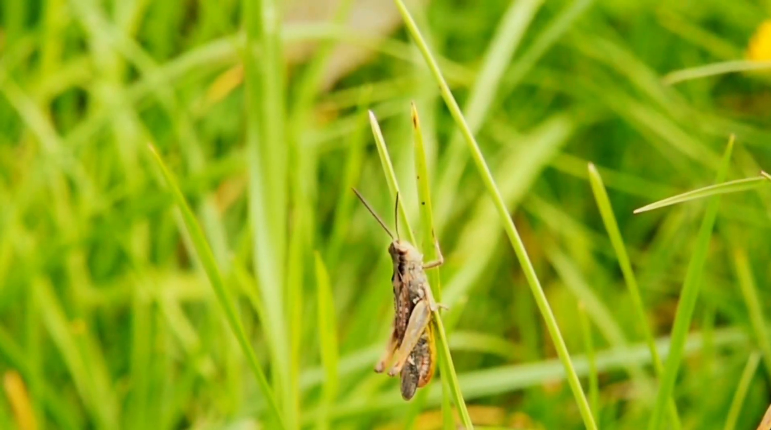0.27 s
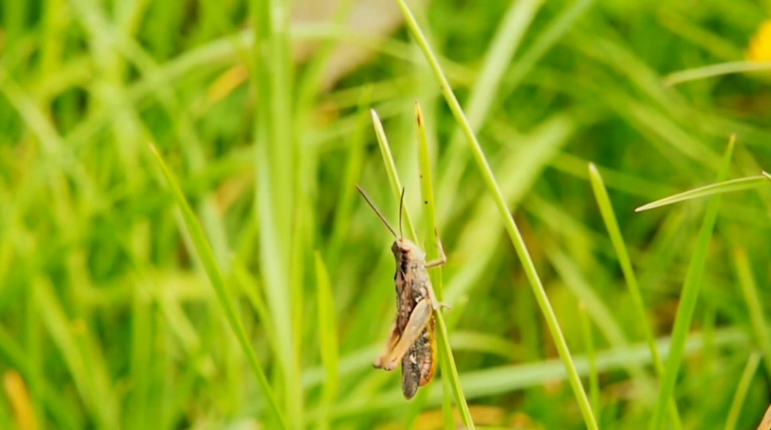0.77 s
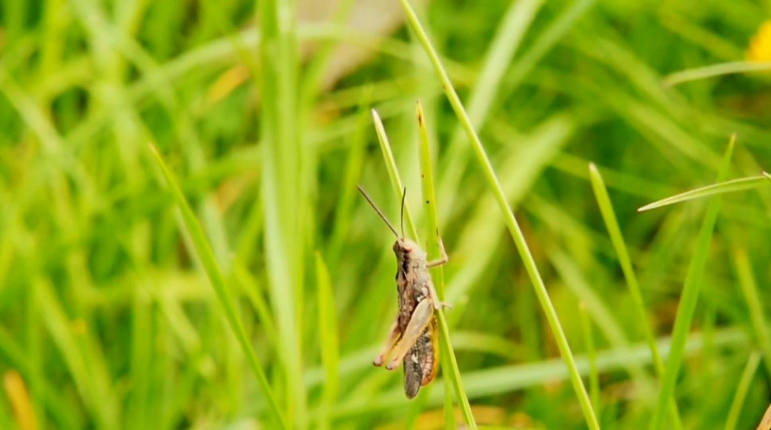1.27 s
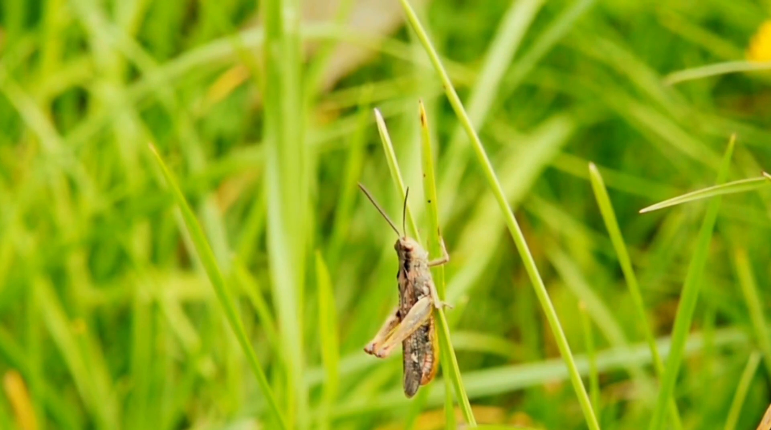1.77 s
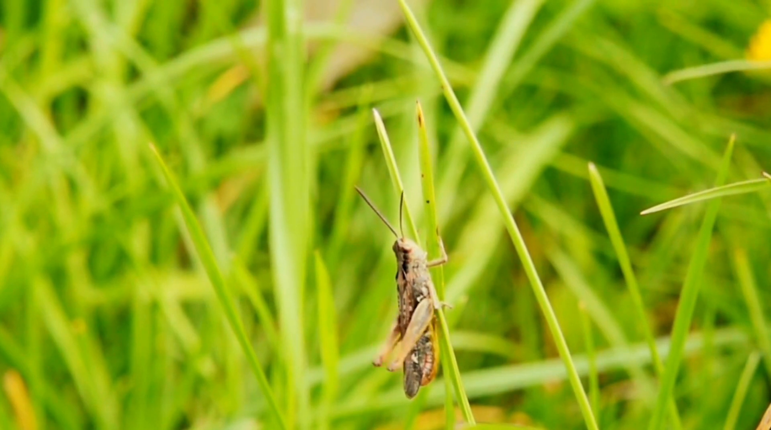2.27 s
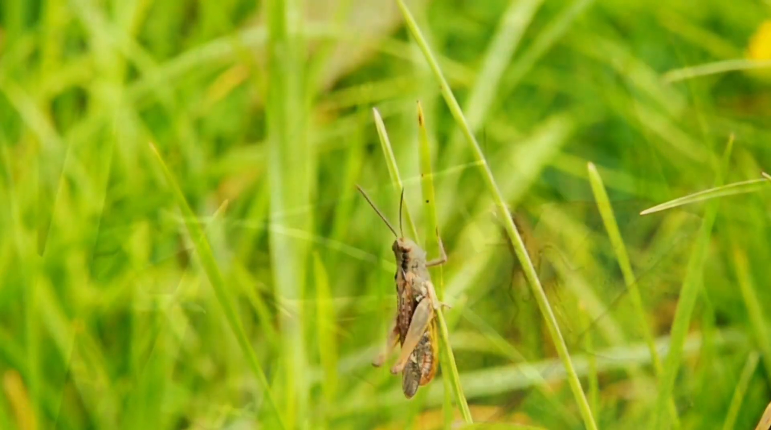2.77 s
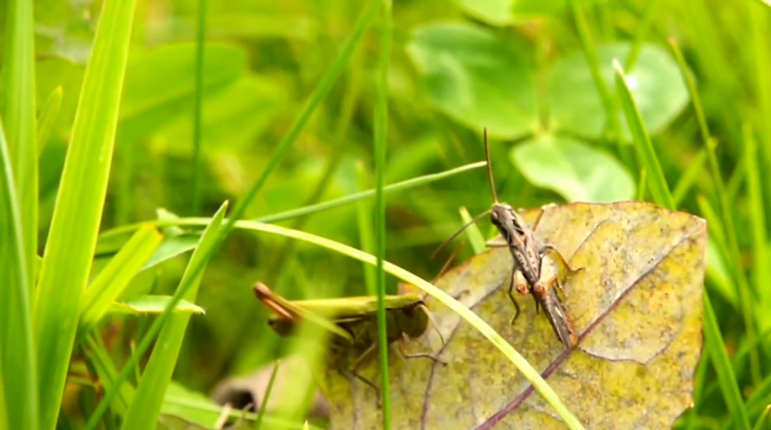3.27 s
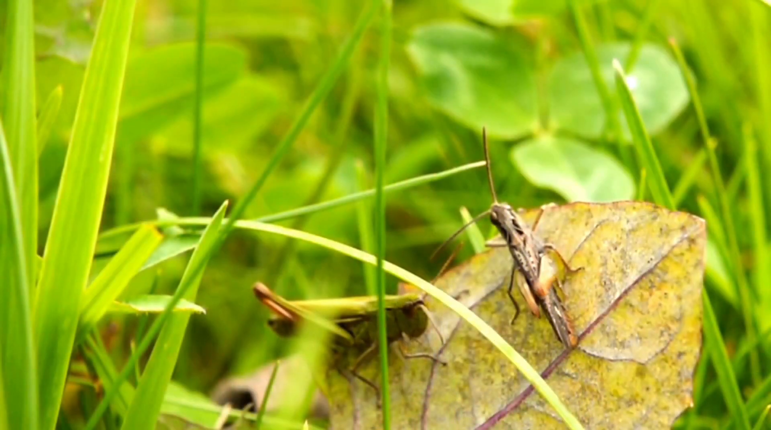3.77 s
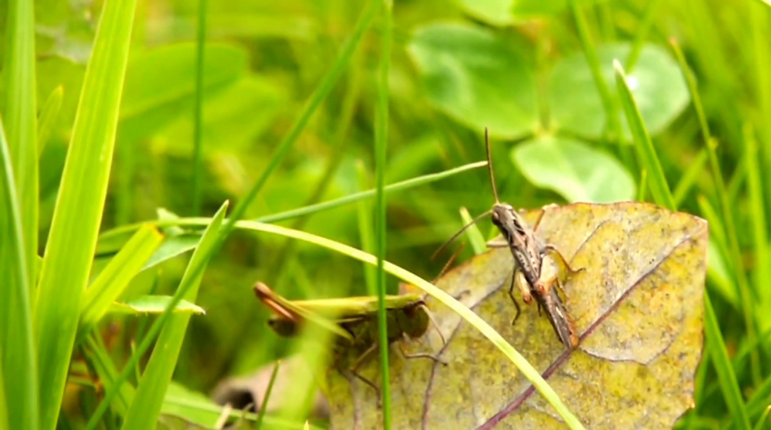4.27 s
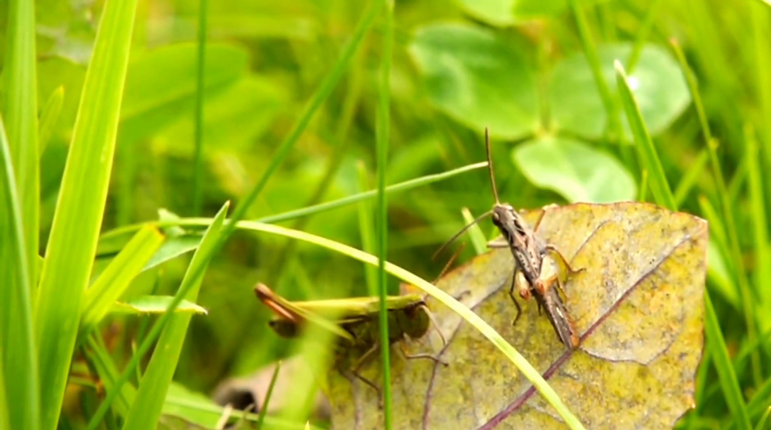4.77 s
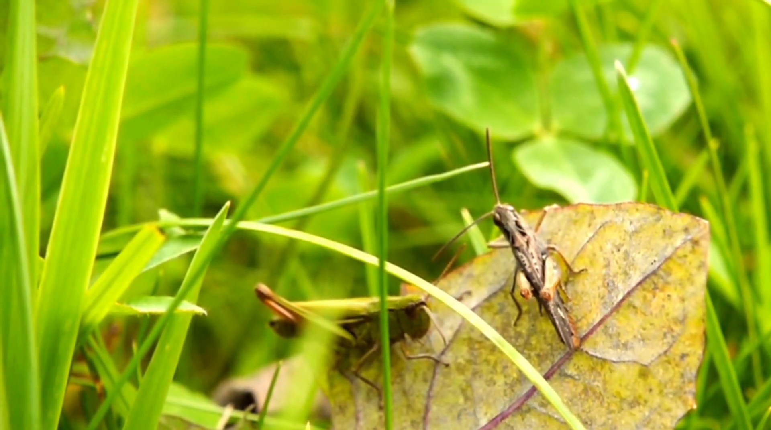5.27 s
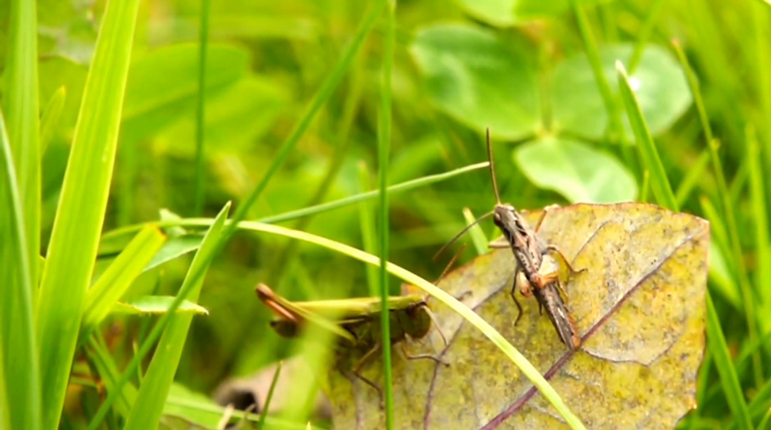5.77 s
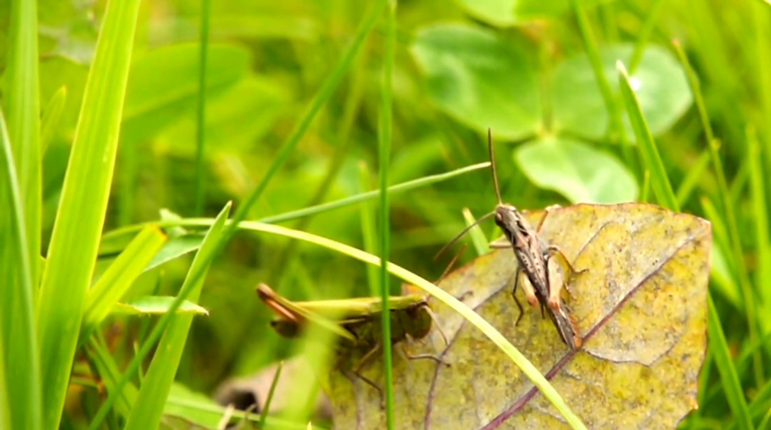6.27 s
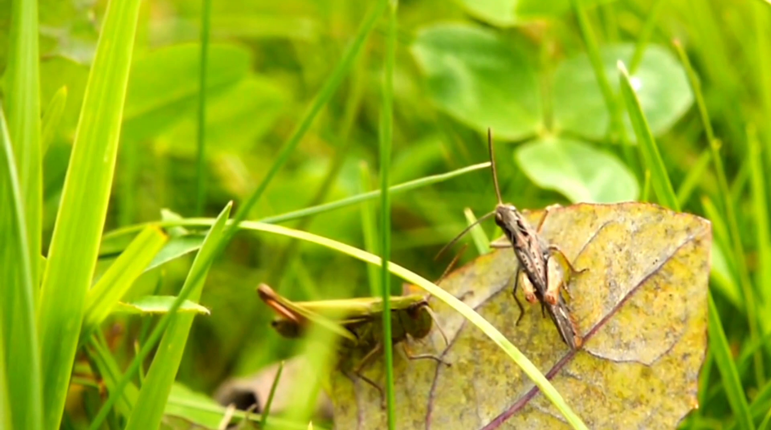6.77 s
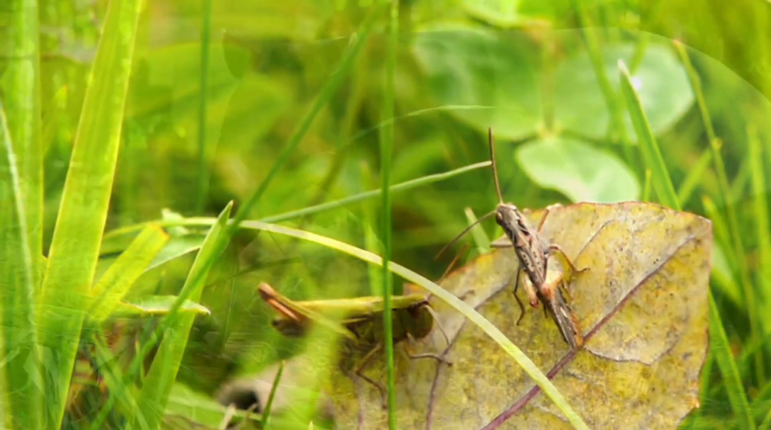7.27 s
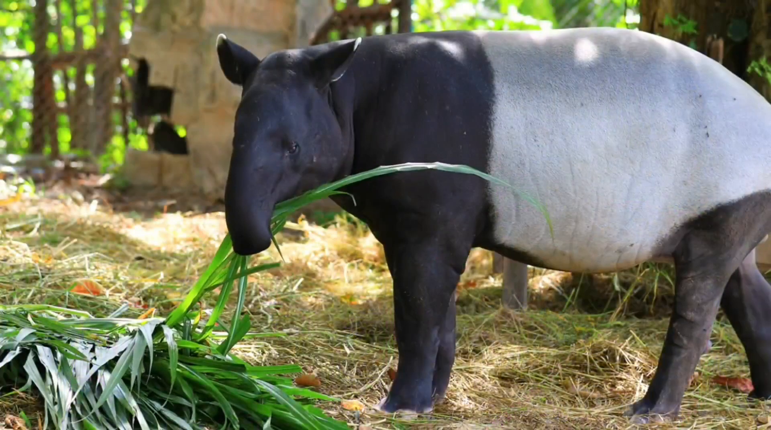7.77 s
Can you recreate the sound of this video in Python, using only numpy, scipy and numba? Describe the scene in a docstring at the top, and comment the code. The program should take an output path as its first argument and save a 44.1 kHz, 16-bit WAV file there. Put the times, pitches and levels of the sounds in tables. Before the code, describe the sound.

Outdoors in a meadow, dry high chirps of a grasshopper dominate, close and slightly overloaded, with little echo beyond a quick scatter off nearby stalks. Each lasts about a tenth of a second and buzzes like a tiny fast scraper. Quiet gaps reveal gentle air noise, a far low motor hum that waxes and wanes, and thin distant croaking and insect tones. The ending is cut short.

```python
"""The scene fades in over about two seconds, with a grasshopper's chirp already under way. Behind it are air hiss,
a far engine drone and a distant chorus, all made of filtered noise. Close by, legs rub on wings in short chirps:
each snap of a leg peg rings the wing. A chirp is a light stroke, a hard one, a faint return and two or three
full down-up cycles. A limiter turns everything down under loud chirps and the loudest strokes overload.
The drone waxes and wanes throughout, and the sound stops abruptly just before the end."""
import sys
import numpy as np
from scipy import signal
from scipy.fft import rfft, irfft, next_fast_len
from scipy.io import wavfile
from scipy.ndimage import uniform_filter1d
from numba import njit

SR = 44100
rng = np.random.default_rng(int(sys.argv[2]) if len(sys.argv) > 2 else 0)


def to_wav(s):
    """Save 16-bit WAV."""
    ch = np.atleast_2d(s).T  # columns
    pcm = np.round(np.clip(ch, -1, 1) * 32767)  # PCM
    wavfile.write(sys.argv[1], SR, pcm.astype(np.int16))


N = 353770  # length in samples, about 8 s

MIC_TOP_HZ = 10800  # top of the band in which the small microphone picks up the insect


def gain_of(db):
    """Turn decibels into a multiplier for the wave."""
    return 10 ** (np.asarray(db) / 20)


def evened(x):
    """Scale a sound to an rms (average strength) of 1."""
    return x / np.sqrt(np.mean(x ** 2) + 1e-20)


def curve(points):
    """Join (time, value) points with straight lines, one value per sample."""
    s, value = np.transpose(points)
    return np.interp(np.arange(N) / SR, s, value)


def add(mix, s, sound):
    """Lay a sound into the mix from second s on."""
    part = mix[round(s * SR):][:len(sound)]
    part += sound[:len(part)]


def wander(per_s):
    """Random drift: straight lines between per_s random points each second."""
    knots = rng.standard_normal(2000)
    return np.interp(np.arange(N) / SR * per_s, np.arange(len(knots)), knots)


def band(hz, width):
    """Noise in one bell-shaped band; at half the width from its middle the wave is half as strong."""
    f = np.fft.rfftfreq(N, 1 / SR)
    bell = 1 / (1 + (2 * (f - hz) / width) ** 2)
    return evened(irfft(rfft(rng.standard_normal(N)) * bell, N))


def air():
    """Wide hiss and rumble: noise coloured by a smooth curve, with a level that drifts."""
    # colour of the air noise: (frequency [Hz], relative level [dB])
    air_colour = [(15, -14), (60, -12), (200, -4.5), (450, -11), (800, -21.5), (1800, -24), (3200, -25),
                  (4300, -32.5), (5600, -27.5), (9000, -29.5), (11000, -36.5), (15000, -37), (20000, -43)]
    air_db, drift_db = -42.5, 1.2
    hz, db = np.transpose(air_colour)
    f = np.fft.rfftfreq(N, 1 / SR)
    colour = gain_of(np.interp(np.log(f + 1), np.log(hz), db))
    noise = evened(irfft(rfft(rng.standard_normal(N)) * colour, N))
    return gain_of(air_db + drift_db * wander(4.07)) * noise


def drone():
    """Far engine: blurred partials near multiples of 40 Hz; deep, middle and upper ones wax apart."""
    # drone partials: (frequency [Hz], width [Hz], level before the swells [dB])
    partials = [(123.8, 14, -54.5), (162.3, 18, -52), (197.7, 13, -46.5), (282.5, 14, -47),
                (320.5, 36, -50), (431.6, 13, -59)]
    # swells of the higher partials: (time [s], middle partial change [dB], upper partials change [dB])
    swell_points = [(0, -0.5, -4.5), (2.4, -7, 0), (3.1, -8.5, 2), (3.9, 4, -0.5), (4.4, 7.5, 3.5),
                    (4.8, -2.5, 2), (5.6, 3, -0.5), (6.5, 2.5, 3.5), (7.2, 1, 3), (7.6, 11.5, 5.5),
                    (8.1, 5, 6)]
    deep_start_db, deep_rise_db_per_s, deep_wander_db = -4.5, 1.14, 3.5
    t = np.arange(N) / SR
    s, middle, upper = np.transpose(swell_points)
    deep = deep_start_db + deep_rise_db_per_s * t + deep_wander_db * wander(2.5)
    swells = (deep, np.interp(t, s, middle), np.interp(t, s, upper))
    out = np.zeros(N)
    for hz, width, db in partials:
        group = int(hz > 180) + int(hz > 240)  # 0 deep, 1 middle, 2 upper
        out += gain_of(db + swells[group]) * band(hz, width)
    return out


def chorus():
    """Far callers blur into two croaking bands and a high insect band; a band with depth above 0 throbs."""
    # bands: (frequency [Hz], width [Hz], level before drift and throb [dB], throb rate [per s], throb depth [0-1])
    callers = [(1399, 165, -48, 55, 0), (2223, 182, -45, 45, 0.12), (6870, 430, -54, 30, 0)]
    out = np.zeros(N)
    for hz, width, db, per_s, depth in callers:
        uneven_rate = per_s * (1 + 0.1536 * wander(4.1))
        throb = 1 + depth * np.cos(2 * np.pi * np.cumsum(uneven_rate) / SR)
        out += gain_of(db + 1.0 * wander(1.6)) * band(hz, width) * throb
    return out


def tail(db, t60, delay_s, low_hz):
    """Scattered sound: noise above low_hz starts after a delay and falls 60 dB in t60 seconds."""
    t = np.arange(SR // 2) / SR - delay_s
    burst = rng.standard_normal(len(t)) * gain_of(-60 * abs(t) / t60)
    burst = burst * np.clip(t * 500, 0, 1)  # silent before the delay, then a 2 ms rise
    burst = signal.sosfilt(signal.butter(2, low_hz, "high", fs=SR, output="sos"), burst)
    return gain_of(db) * burst / np.linalg.norm(burst)


def meadow(x):
    """Quick scatter from nearby stalks, a faint longer wash of treble and one blurred echo from farther off."""
    near = tail(db=-10, t60=0.032, delay_s=0.00068, low_hz=2100)
    wash = tail(db=-28, t60=0.18, delay_s=0.01, low_hz=4640)
    echo = tail(db=-41.5, t60=0.24, delay_s=0.088, low_hz=4400)
    return signal.fftconvolve(x, near + wash + echo)[:len(x)]


def stroke(ms, db, bright_hz, modes, rise, fall, bite, body_db, pegs_per_s, focus_db):
    """The pegs of the leg snap over a wing vein in jerky runs; each snap rings the wing modes."""
    length = round(ms * SR / 1000)
    u = np.arange(length) / (ms * SR / 1000)  # 0 to 1 through the stroke
    chance, size, sign = rng.random((3, 1300))[:, :len(u)]
    jerks = np.interp(np.arange(len(u)) / SR * 750, np.arange(30), rng.standard_normal(30))
    snaps = (chance < pegs_per_s / SR) * (.4 + size) * np.sign(sign - .5)
    snaps = snaps * gain_of(6.0 * np.clip(jerks, -2, 1.2))
    snaps[round(rise * len(u))] += bite  # one extra snap where the push is full
    push_in = np.sin(np.pi / 2 * np.clip(u / rise, 0, 1)) ** 2
    push_out = np.sin(np.pi / 2 * np.clip((1 - u) / fall, 0, 1))

    hz, width, mode_db = modes[:, :, None]
    # the rubbed spot favours modes near its own pitch
    near_db = -focus_db * np.log2(hz / bright_hz) ** 2
    mode_db = mode_db + np.where(hz > 5000, near_db, body_db) + 1.2 * rng.standard_normal(hz.shape)
    t = np.arange(400) / SR
    uneven_hz = hz * (1 + 0.019 * rng.standard_normal(hz.shape))
    phase = 2 * np.pi * uneven_hz * t + np.pi * np.arange(len(hz))[:, None]
    decay = np.exp(-np.pi * width * t)  # wider modes die faster
    ring = (gain_of(mode_db) * np.sqrt(width) * decay * np.sin(phase)).sum(0)
    sound = np.convolve(snaps * push_in * push_out, ring * np.minimum(t * 8000, 1))
    return gain_of(db) * sound / np.sqrt((sound ** 2).sum() / len(u) + 1e-20)


def grasshopper():
    """Legs rub in chirps: strokes from rest bite at once, down strokes after an up stroke swell."""
    # wing modes: (frequency [Hz], width [Hz], relative down-stroke level [dB], relative up-stroke level [dB])
    wing_modes = [(2353, 570, -21.5, -26.5), (2760, 296, -14.5, -28.5), (3450, 420, -12.5, -18.5),
                  (4060, 660, -17, -24), (5748, 470, 0.5, 4), (6813, 180, -2.5, -3.5), (7245, 305, -2, 0),
                  (7883, 340, 1, -8.5), (8259, 430, 3.5, -25), (8974, 390, -2.5, 6.5),
                  (9860, 280, -9.5, -19), (9883, 510, -5.5, -7.5), (10340, 500, -19, -7)]
    # chirps: (start [s], wait until the hard stroke [ms], full leg cycles after it [count], cycle [ms],
    #          opening stroke level [dB], base down-stroke level [dB], base up-stroke level [dB])
    chirps = [(-0.097, 15.7, 2, 29.4, 1, 0.5, 3.5), (0.2813, 20.4, 2, 30, -5, 5.5, -0.5),
              (0.607, 21.8, 2, 30, -6, 2.5, -4.5), (0.9214, 20.2, 3, 30.5, -6, 3.5, -1),
              (1.3063, 19.8, 2, 31, -7.5, 5, 2), (1.6676, 20.4, 2, 31.2, -4.5, 6, 0),
              (2.0356, 22.3, 3, 32.2, -6.5, 5, -3), (2.4798, 20.7, 2, 31.6, -6, 2.5, -2),
              (2.822, 20.6, 3, 30.2, -6.5, 3.5, -2.5), (3.242, 21.4, 2, 28.8, -8, 2.5, -2),
              (3.6536, 20.2, 2, 30.3, -6.5, 2.2, -4.5), (4.1151, 22.8, 2, 29.4, -7, 1.5, -5.5),
              (4.5269, 19.3, 3, 33.2, -6, 1, -11), (4.9226, 21.8, 2, 30, -4, 2.5, -9.5),
              (5.3408, 21.5, 3, 29.4, -5.5, 3.5, -0.5), (5.756, 22, 2, 29.3, -5, 4.5, -4),
              (6.1833, 21.8, 2, 27.6, -4.5, 3, -6), (6.6184, 23.2, 2, 29.2, -6.5, 0.3, -8.5),
              (7.2452, 22.4, 3, 30, -6.5, 1.8, -9), (7.7135, 20.1, 2, 29.5, -7, 4, -7.5)]
    open_ms, open_hz = 7.4, 7860  # light opening stroke
    hard_ms, hard_db, hard_hz = 15, -0.1, 8080  # short hard down stroke
    return_after_ms, return_ms, return_db, return_hz = 14.5, 8.7, -5.5, 6040  # faint return
    cycles_after_ms = 23.0  # from the hard stroke to the first full cycle
    down_share, up_from, up_share = .68, .7, .29  # parts of one cycle
    down_hz, up_hz, last_down_hz = 7480, 7900, 7530
    last_down_db, last_up_db = 1.5, 3  # the closing cycle is pushed harder
    uneven = (0.72, 146.6)  # random spread of strokes: level [dB], pitch [Hz]
    lead_s = .2  # room for the chirp already under way at the start
    bites, swells = (.05, 0.21, 1.5), (.6, 0.24, 1)  # (rise share, fall share, extra snap)
    out = np.zeros(N + round(lead_s * SR))
    wing = np.transpose(wing_modes)

    def down(s, ms, db, hz, shape, body_db=0):
        """Push the leg down: the down-stroke mode levels ring."""
        db, hz = (db, hz) + rng.standard_normal(2) * uneven
        sound = stroke(ms, db, hz, wing[[0, 1, 2]], *shape, body_db, pegs_per_s=4300, focus_db=34.5)
        add(out, lead_s + s, sound)

    def up(s, ms, db, hz):
        """Draw the leg up: the up-stroke mode levels ring, with no extra snap."""
        db, hz = (db, hz) + rng.standard_normal(2) * uneven
        sound = stroke(ms, db, hz, wing[[0, 1, 3]], 0.35, 0.33, 0, 0, pegs_per_s=4500, focus_db=29)
        add(out, lead_s + s, sound)

    for s, wait_ms, cycles, cycle_ms, open_db, down_db, up_db in chirps:
        hard_s = s + wait_ms / 1000
        down(s, open_ms, open_db, open_hz, bites, body_db=2.5)  # more low body
        down(hard_s, hard_ms, down_db + hard_db, hard_hz, bites)
        up(hard_s + return_after_ms / 1000, return_ms, up_db + return_db, return_hz)
        for k in range(round(cycles)):
            at = hard_s + (cycles_after_ms + k * cycle_ms) / 1000
            last = k == round(cycles) - 1
            pitch = last_down_hz if last else down_hz
            down(at, down_share * cycle_ms, down_db + last * last_down_db, pitch, swells)
            up_s = at + up_from * cycle_ms / 1000
            up(up_s, up_share * cycle_ms, up_db + last * last_up_db, up_hz)
    return signal.sosfilt(signal.butter(3, 1900, "high", fs=SR, output="sos"), out)


def scene():
    """Mix the insect and its scatter with the background, then shape the level of the whole."""
    # level of the whole scene: (time [s], level [dB])
    fade_points = [(0, -14), (.5, -6), (1.2, -1), (2.2, 0.5), (4, 0), (8.1, -2)]
    insect = grasshopper()
    insect = insect + meadow(insect)
    top_cut = signal.cheby1(12, .5, MIC_TOP_HZ, fs=SR, output="sos")
    insect = signal.sosfilt(top_cut, insect)[-N:]  # drop the lead-in
    offset = -.0088  # a small offset of the microphone line, before the fade
    mix = insect + air() + drone() + chorus() + offset
    return (mix * gain_of(curve(fade_points)))[None]


@njit
def follow(allowed, attack, release):
    """Gain that drops quickly towards what the peaks allow and creeps back up."""
    out, now = np.empty(len(allowed)), allowed[:200].min()
    for k in range(len(allowed)):
        now += (allowed[k] - now) * (attack if allowed[k] < now else release)
        out[k] = now
    return out


def record(dry):
    """A lagging peak limiter, fizz that rides on loud sound, overload, an abrupt stop and a treble limit."""
    attack_s, release_s = .0006, .16
    peaks = abs(signal.hilbert(dry[0], next_fast_len(N))[:N])
    allowed = np.minimum(1, 1.0 / (peaks + 1e-9))
    ducked = dry * follow(allowed, 1 / (attack_s * SR), 1 / (release_s * SR))

    loudness = np.sqrt(abs(uniform_filter1d(ducked ** 2, 400)))
    fizz = gain_of(-33) * loudness * signal.lfilter([1], [1, -.5], rng.standard_normal(N))

    ceiling = .93
    clipped = ceiling * ducked / (1 + abs(ducked / ceiling) ** 10) ** (1 / 10)
    # the overload's distortion is 9 dB softer outside the band from 1.8 to 10.8 kHz
    middle_band = signal.firwin(127, [1800, MIC_TOP_HZ], pass_zero=False, fs=SR)[None]
    distortion = clipped - ducked
    splatter = distortion - signal.oaconvolve(distortion, middle_band, "same")
    sound = clipped - (1 - gain_of(-9)) * splatter + fizz

    stop_s, stop_fade_s, treble_limit_hz = 7.926, 0.0038, 15600
    sound = sound * np.clip((stop_s - np.arange(N) / SR) / stop_fade_s, 0, 1)
    low_pass = signal.firwin(255, treble_limit_hz, window=("kaiser", 8), fs=SR)[None]
    return signal.oaconvolve(sound, low_pass, "same")


dry = scene()
out = record(dry)
to_wav(out)
```